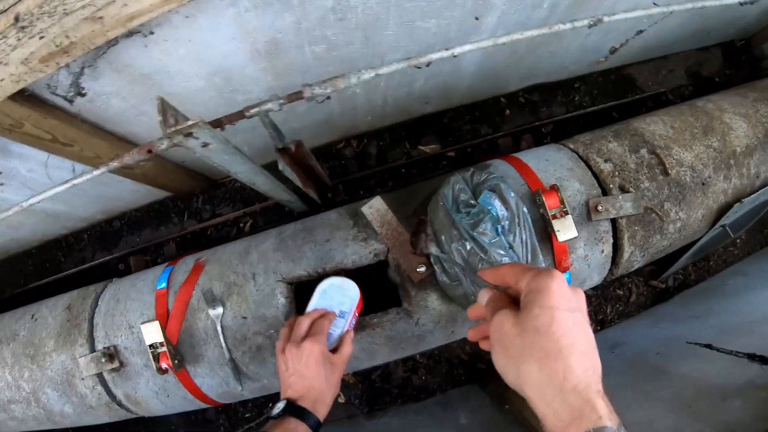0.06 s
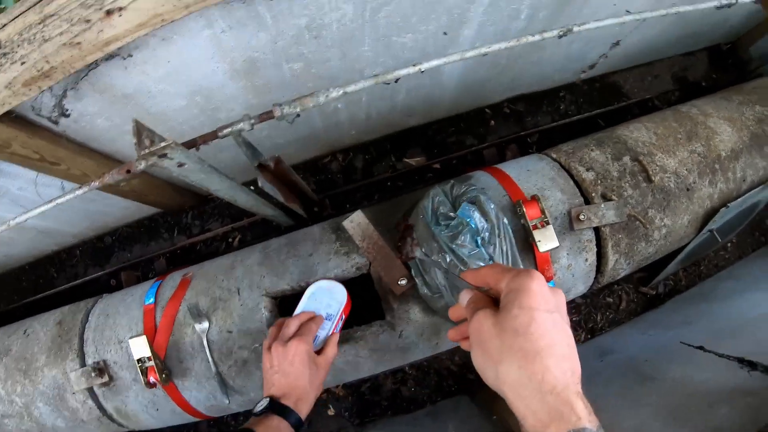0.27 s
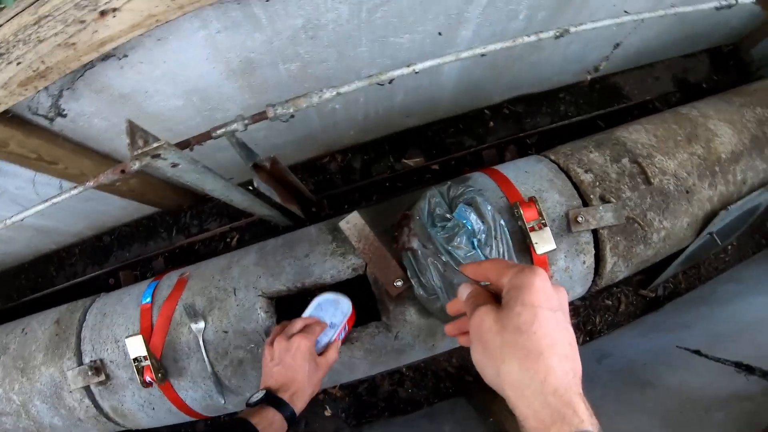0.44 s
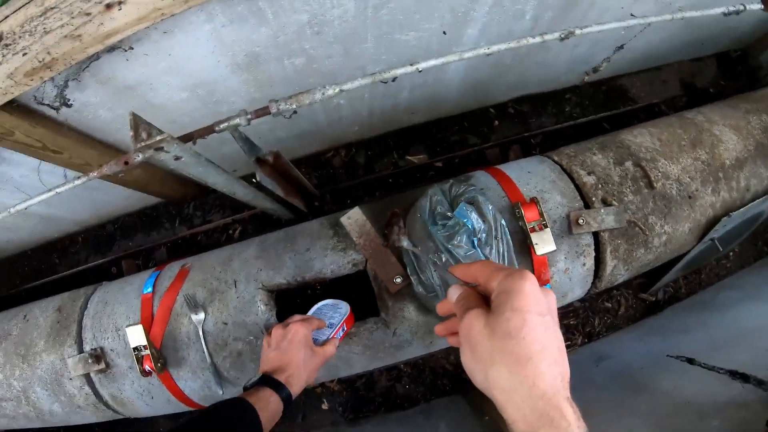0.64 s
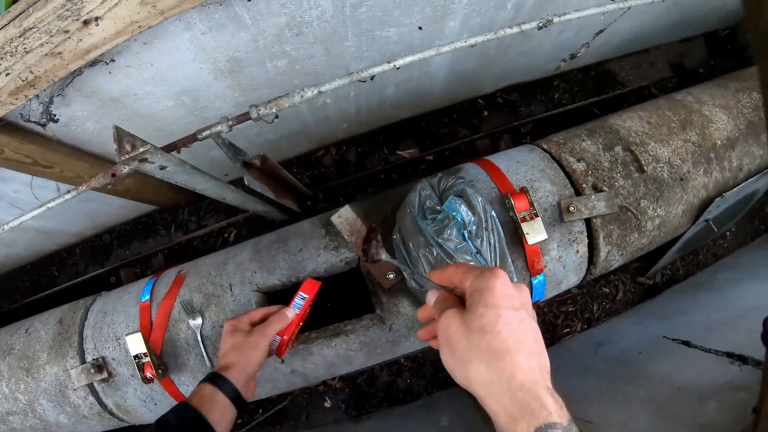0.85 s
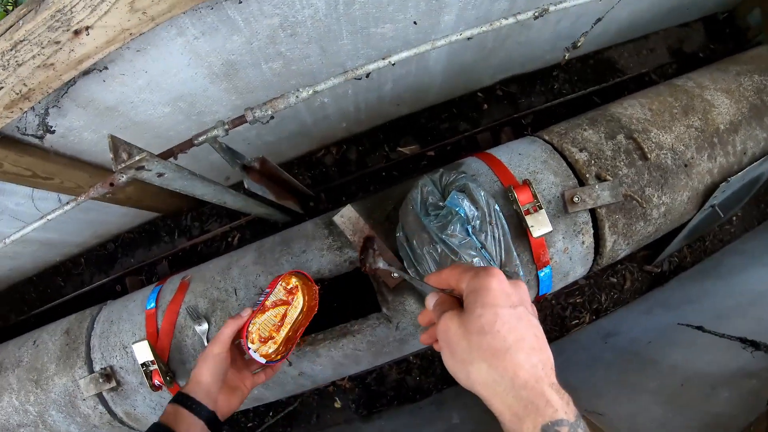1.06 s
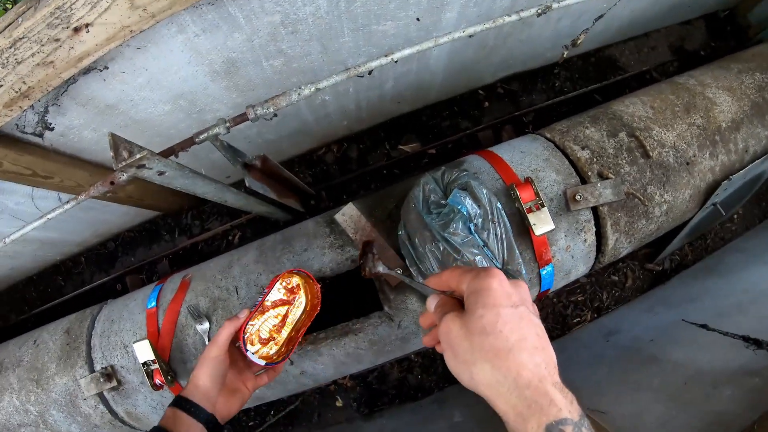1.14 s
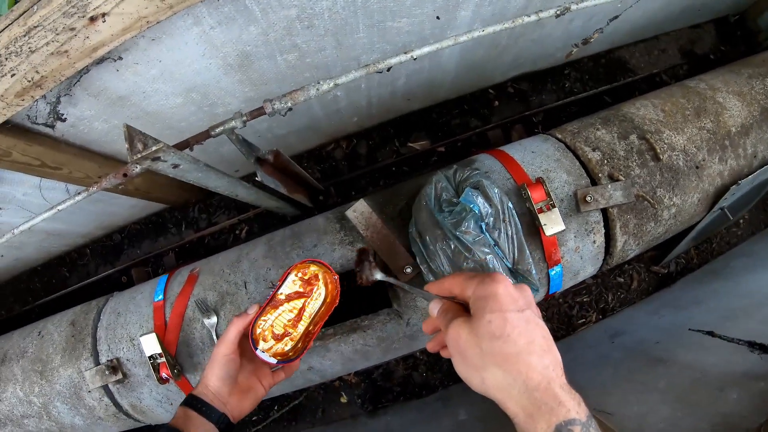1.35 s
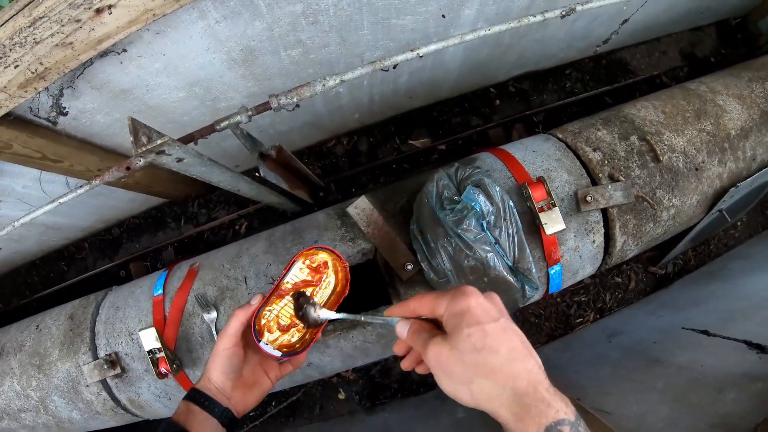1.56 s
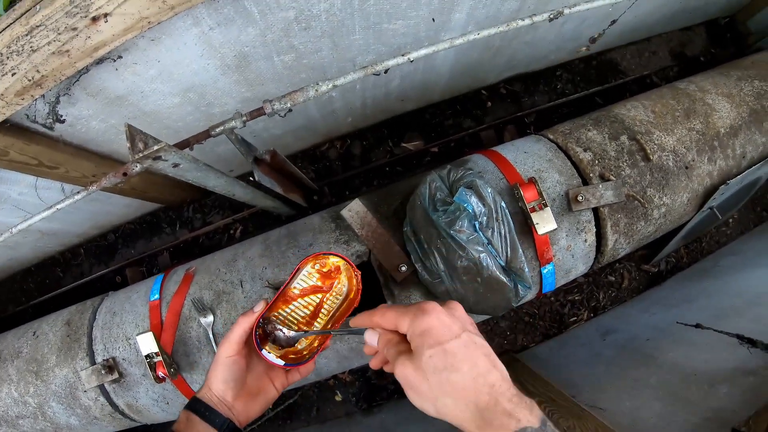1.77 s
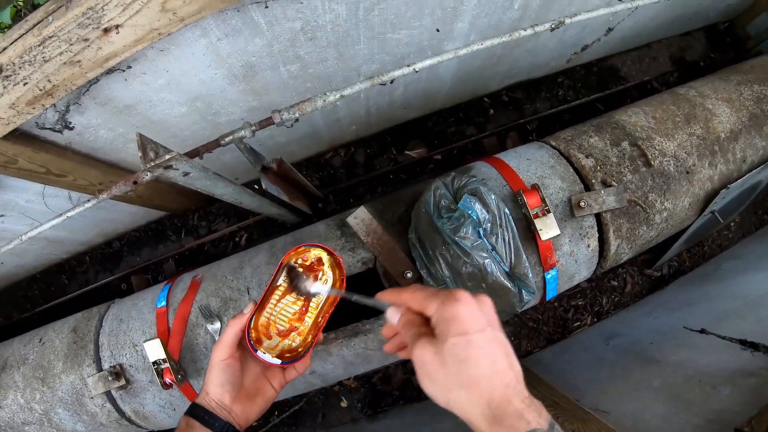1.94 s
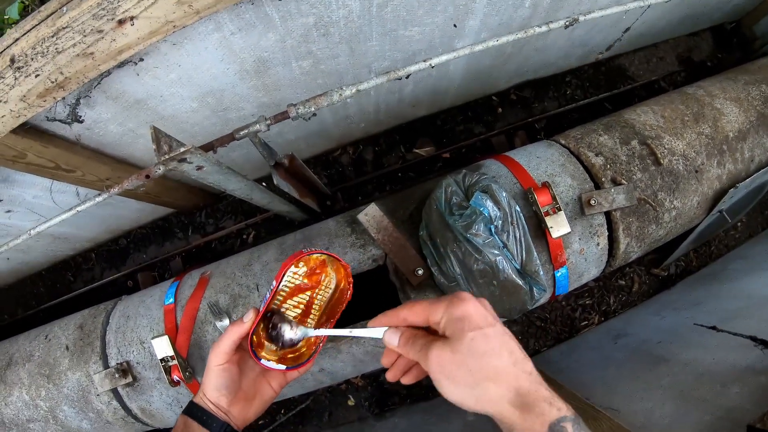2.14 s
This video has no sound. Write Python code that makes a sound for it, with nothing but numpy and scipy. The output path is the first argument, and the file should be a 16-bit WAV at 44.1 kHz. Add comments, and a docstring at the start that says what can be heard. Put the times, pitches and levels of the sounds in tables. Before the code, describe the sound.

A small food tin clacks four times in quick succession against a steel pipe, which rings faintly. After a pause, a spoon ticks into the tin and scrapes once. The sounds are close, outdoors, over low wind.

```python
"""Outdoors, a small food tin is knocked four times on the rim of an opening in a big steel pipe.
Each knock is a bright clack of thin metal with a duller second contact as the tin settles, and the
pipe rings faintly on. Two light ticks fall between the first knocks. Then a spoon ticks into the tin
and scrapes once along its bottom, sticking and slipping, over quiet air and low wind."""
import sys
import numpy as np
from scipy import signal
from scipy.fft import rfft, irfft
from scipy.io import wavfile
from scipy.ndimage import uniform_filter1d

SR = 44100
rng = np.random.default_rng(int(sys.argv[2]) if len(sys.argv) > 2 else 0)


def store_pcm(level_fs):
    """Save levels as 16-bit WAV."""
    pcm = np.round(np.clip(level_fs, -1, 1) * 32767).astype(np.int16)
    wavfile.write(sys.argv[1], SR, np.atleast_2d(pcm).T)


N = 97020
TOP_HZ = 15750

# The tin's upper resonances, which colour every clack. Each row: centre in Hz, width in Hz, lift in dB.
TIN_SHEEN = [(2754, 18, 5.5), (3840, 210, 5.5), (4290, 250, 6.5), (5340, 270, 7.5), (6170, 97, 8),
             (6520, 100, 8), (7030, 220, 8), (8060, 480, 5), (8940, 190, 0.5), (9300, 240, 1),
             (9900, 460, 3), (10640, 320, 3.5), (11360, 250, -0.5), (12140, 370, 10), (13500, 310, 7.5),
             (14200, 290, 4)]
# The tone of the spoon touching the tin. Each row: frequency in Hz, relative level in dB.
SPOON_EQ = [(130, -25), (270, -27), (440, -36), (800, -2), (1500, -4.5), (2900, -1.5), (3500, -12.5),
            (5200, -7), (7000, -24), (10500, -10.5), (16000, -22)]


def amp(db):
    """Decibels to gain."""
    return 10 ** (np.asarray(db) / 20)


def unit(x):
    """Scales to an rms of 1."""
    return x / np.sqrt(np.mean(x ** 2) + 1e-20)


def read(curve, hz):
    """Reads a curve on a log-frequency axis."""
    points_hz, values = np.transpose(curve)
    return np.interp(np.log(hz + 1), np.log(points_hz + 1), values)


def add(mix, start_s, sound):
    """Mixes a sound in at its start time."""
    part = mix[max(round(start_s * SR), 0):][:len(sound)]
    part += sound[:len(part)]


def seconds(size):
    """Time axis."""
    return np.arange(size) / SR


def colour(x, eq, peaks=(), size=4096):
    """Minimum-phase EQ of unit energy, drawn from a curve and resonant peaks."""
    hz = abs(np.fft.fftfreq(size, 1 / SR))
    db = read(eq, hz) + sum(lift / (1 + (2 * (hz - centre) / width) ** 2) for centre, width, lift in peaks)
    response = np.exp(np.conj(signal.hilbert(np.log(amp(db)))))
    taps = np.fft.ifft(response).real[:size // 2]
    return signal.fftconvolve(x, taps / np.linalg.norm(taps))[:len(x)]


def shelf(x, treble_db, corner_hz=3000):
    """Raises or lowers the treble."""
    low = signal.lfilter(*signal.butter(1, corner_hz, fs=SR), x)
    return low + amp(treble_db) * (x - low)


def resonate(x, hz, width_hz):
    """A resonance of gain 1 whose centre may glide."""
    carrier = np.exp(2j * np.pi * np.cumsum(hz * np.ones(len(x))) / SR)
    pole = np.exp(-np.pi * width_hz / SR)
    return 2 * (carrier * signal.lfilter([1 - pole], [1, -pole], x / carrier)).real


def dying_noise(t60_curve, size=16384):
    """Noise whose bands each die at their own speed."""
    hz, t, bands = signal.stft(rng.standard_normal(size), SR, nperseg=256)
    return signal.istft(bands * amp(-60 * t / read(t60_curve, hz)[:, None]), SR)[1][:size]


def burst(t60, hold_s=0, attack_s=0.0004, size=16384):
    """Chatter of a metal contact: quick attack, hold, fast decay."""
    t = seconds(size)
    envelope = np.minimum(t / attack_s, 1) * amp(-60 * np.maximum(t - hold_s, 0) / t60)
    return rng.standard_normal(size) * envelope


def mode(hz, db, t60, attack_s=0.0037):
    """One dying partial, struck from rest."""
    t = seconds(SR)
    return amp(db - 60 * t / t60) * np.minimum(t / attack_s, 1) * np.sin(2 * np.pi * hz * t)


def air_and_wind(air_trim_db=-55.5):
    """The bed: a smooth distant hiss and low lumps of wind."""
    # The tone of each layer. Each row: frequency in Hz, relative level in dB.
    air_eq = [(59, -40), (100, -1.5), (215, -5), (328, -6), (365, -3.5), (910, -12), (991, -14.5),
              (6020, -19), (12400, -23), (16000, -36)]
    wind_eq = [(15, -1), (28, 0), (50, -5), (90, -16.5), (160, -26.5), (400, -53.5)]
    # The breeze rises and falls. Each row: time in seconds, wind level in dB, air lift in dB.
    breeze = [(0, -36.5, 8), (.08, -47, 4.5), (.7, -48, 1.5), (1.1, -48, 0), (1.4, -48.5, 0), (1.6, -46, 0),
              (1.95, -44.5, 4.5), (2.06, -49.5, -1.5), (2.18, -36, -0.5)]
    times, wind_db, air_db = np.transpose(breeze)
    hz, t = np.fft.rfftfreq(N, 1 / SR), seconds(N)
    wind_band = (hz > wind_eq[0][0]) & (hz < wind_eq[-1][0])
    air = unit(irfft(rfft(rng.standard_normal(N)) * amp(read(air_eq, hz)) * (hz < TOP_HZ), N))
    wind = unit(irfft(rfft(rng.standard_normal(N)) * amp(read(wind_eq, hz)) * wind_band, N))
    return air * amp(air_trim_db + np.interp(t, times, air_db)) + wind * amp(np.interp(t, times, wind_db))


def reflections(close, wet_db=-23):
    """A faint, short return from the surfaces nearby."""
    # The treble dies first. Each row: frequency in Hz, t60 in seconds.
    return_t60 = [(150, 0.254), (1500, 0.24), (5000, 0.19), (15000, 0.16)]
    impulse = dying_noise(return_t60)
    return amp(wet_db) * signal.fftconvolve(close, impulse / np.linalg.norm(impulse))[:N]


def spoon_ticks():
    """Light, damped touches of spoon and tin, each with a brief ring and a faint diffuse tail."""
    # Each row: start in seconds, gain in dB, treble shelf in dB.
    touches = [(0.2315, -14, 2), (.243, -13.5, 7.5), (1.6535, 1, -1)]
    # What a tick rings in the held tin. Each row: pitch in Hz, level in dB, t60 in seconds.
    tick_modes = [(460, -29, 0.033), (1420, -31.5, 0.042), (1660, -31.5, 0.044), (2240, -34, 0.031),
                  (2950, -33, 0.035), (5270, -39, 0.016)]
    out = np.zeros(N)
    for start, db, treble_db in touches:
        contact = burst(t60=0.027, hold_s=0.001) + amp(-11) * burst(t60=0.15)
        tick = sum(mode(*row) for row in tick_modes)
        add(tick, 0, amp(-30.5) * colour(contact, SPOON_EQ))
        add(out, start, amp(db) * shelf(tick, treble_db))
    return out


def spoon_scrape(wall_s=1.904):
    """The spoon glides, then sticks and slips; each slip rings the tin and swells the rasp of grit."""
    # The stroke. Each row: time in seconds, slips per second, body level in dB, grit level in dB.
    stroke = [(1.842, 87.3, -35, -45.5), (1.865, 117.7, -31.5, -38), (1.888, 134.5, -32.5, -34.5),
              (1.906, 183, -23, -27), (1.918, 182, -35, -25), (1.93, 150, -52, -33),
              (1.938, 150, -35.5, -35.5), (1.955, 125, -50, -50)]
    # The tin held in the hand. Each row: centre in Hz, width in Hz, relative level in dB.
    body_resonances = [(694, 22, -29), (1120, 114, -4), (1302, 110, 2.5), (1420, 78, 8), (1730, 97, -0.5),
                       (2440, 44, -5), (2936, 50, -3)]
    # The tone of the rasp. Each row: frequency in Hz, relative level in dB.
    grit_eq = [(150, -5), (250, -24), (420, 4), (650, -34), (900, 0), (1500, 5.5), (2800, 0.5), (4000, -5),
               (7000, -11.5), (10500, -7), (16000, -15.5)]
    # The bottom flexes as the spoon meets the wall. Each row: pitch in Hz, level in dB, t60 in seconds.
    bottom_modes = [(172, -34, 0.19), (364.5, -23, 0.11), (530, -32, 0.079), (725, -32, 0.1),
                    (2240, -23.5, 0.06)]
    jitter, snap, drag, slip_decay_s = 0.012, 16.5, 0.28, 0.0007
    grit_floor, grit_decay_s = 0.36, 0.0036
    glide_s, glide_width_s = 1.81, 0.028

    times, rates, body_db, grit_db = np.transpose(stroke)
    t = np.arange(times[0], times[-1], 1 / SR)
    wobble = unit(uniform_filter1d(rng.standard_normal(N), size=200))[:len(t)]
    rate = np.interp(t, times, rates) * (1 + jitter * wobble)
    cycles = np.cumsum(rate) / SR
    slips = np.diff(np.floor(cycles), prepend=-1)
    since_slip = cycles % 1 / rate
    rub = (drag + np.exp(-since_slip / slip_decay_s)) * rng.standard_normal(N)[:len(t)]
    friction = snap * slips + rub
    body = sum((-1) ** k * amp(db) * resonate(friction, hz, width)
               for k, (hz, width, db) in enumerate(body_resonances))
    flex_hz = np.interp(t, [times[0], wall_s], [440, 363])  # the bottom's note sinks as the spoon travels
    body += amp(3) * resonate(friction, flex_hz, width_hz=58)
    grit_pulse = grit_floor + np.exp(-since_slip / grit_decay_s)
    grit = colour(grit_pulse * rng.standard_normal(N)[:len(t)], grit_eq)
    glide = shelf(colour(rng.standard_normal(N), SPOON_EQ), treble_db=-19)

    out = amp(-49.5) * np.exp(-((seconds(N) - glide_s) / glide_width_s) ** 2) * glide
    add(out, times[0], unit(body) * amp(np.interp(t, times, body_db)))
    add(out, times[0], unit(grit) * amp(np.interp(t, times, grit_db)))
    add(out, wall_s, sum(mode(*row) for row in bottom_modes))
    return out


def pipe_ring():
    """The long, faint ring of the struck steel pipe."""
    # Each row: pitch in Hz, level in dB, t60 in seconds.
    pipe_modes = [(185.7, -30, 0.35), (816, -46.5, 0.76), (1350, -45.5, 0.4), (1682, -43, 0.37),
                  (1812, -42, 0.39), (2320, -48.5, 0.46)]
    return sum(mode(*row) for row in pipe_modes)


def tin_rebounds():
    """The tin settles after each knock: a softer, duller contact with a short thud."""
    # Each row: start in seconds, contact level in dB, thud pitch in Hz, thud level in dB.
    rebounds = [(.1287, -15.5, 550, -19.5), (0.2983, -19.5, 475, -33), (.4455, -21, 449, -21),
                (.5565, -23.5, 601, -13.5)]
    # The tone of the contact. Each row: frequency in Hz, relative level in dB.
    rebound_eq = [(100, -9), (500, -7.5), (790, -14), (1100, -0.5), (1700, -4), (2500, -12), (4000, -19),
                  (6000, -25), (12000, -29.5), (16000, -33)]
    out = np.zeros(N)
    for start, db, thud_hz, thud_db in rebounds:
        add(out, start, amp(db) * colour(burst(t60=0.088), rebound_eq, TIN_SHEEN))
        add(out, start, mode(thud_hz, thud_db, t60=0.037))
    return out


def tin_clack(decay_scale, clatter_attack_s=0.01):
    """The rim bites, the thin metal's dense modes clack, and a clatter follows."""
    # The tone of clack and clatter. Each row: frequency in Hz, relative level in dB.
    clack_eq = [(80, -11.5), (400, -8.5), (600, -6), (790, -7), (1100, 2), (1800, 1), (2500, -6.5),
                (4000, -5.5), (4800, -9), (7000, -8), (13000, -13), (16000, -16)]
    clatter_eq = [(80, -19.5), (450, -12.5), (790, -23.5), (1150, 0.5), (1700, -6.5), (2600, 3.5),
                  (4000, 0), (6000, -11), (11000, -6.5), (16000, -46)]
    # The clatter's decay. Each row: frequency in Hz, t60 in seconds before scaling.
    clatter_t60 = [(150, 0.38), (600, 0.31), (1400, 0.26), (3000, .115), (7000, 0.11), (15000, 0.12)]
    contact = amp(-11) * burst(t60=0.022, hold_s=0.0036)
    add(contact, 0.00067, [amp(3.5)])  # one spike: the rim's sharp first bite
    tail = dying_noise([(hz, t60 * decay_scale) for hz, t60 in clatter_t60])
    tail *= np.minimum(seconds(len(tail)) / clatter_attack_s, 1)
    return colour(contact, clack_eq, TIN_SHEEN) + amp(-16) * colour(tail, clatter_eq, TIN_SHEEN)


def tin_knocks(scatter_db=3, earlier_knock_s=0.17):
    """Four blows ring both tin and pipe; where the tin lands decides which of its bands speaks most."""
    # Each row: start in seconds, gain in dB, treble shelf in dB, lifts of the low, middle and high
    # bands in dB, pipe trim in dB, scale on the tin's decay times.
    blows = [(0.1138, 0.5, -1, 5, -7, 4, -1, 0.78), (0.2785, 1, -1, 1.5, 1, 0.5, -2.5, 0.87),
             (0.425, 0, 0.5, -0.5, 2.5, -2.5, -1, 0.76), (0.538, -3, -5, 0.5, 5, -5, -1.5, 0.84)]
    # The tin against the pipe. Each row: pitch in Hz, mean level in dB, t60 in seconds before scaling.
    tin_modes = [(275.4, -32, 0.18), (545, -36, 0.21), (905, -28.5, 0.16), (1028, -27, 0.14),
                 (1112, -23.5, .13), (1168, -21.5, 0.115), (1241, -23.5, 0.12), (1325, -28, 0.13),
                 (1668, -16, .095), (1722, -18.5, 0.06), (1819, -21.5, 0.115), (1950, -25, 0.08),
                 (2047, -21.5, 0.075), (2247, -24, 0.08), (2544, -27, .1), (2725, -26, .085),
                 (2897, -26, 0.09), (3776, -23, 0.08)]
    out = np.zeros(N)
    for start, db, treble_db, low_db, mid_db, high_db, pipe_db, decay_scale in blows:
        clack = shelf(tin_clack(decay_scale), treble_db)
        tin = sum(mode(hz, level + scatter_db * rng.standard_normal(), t60 * decay_scale)
                  for hz, level, t60 in tin_modes)
        add(tin, 0, clack)
        bands = [(1200, 300, low_db), (1685, 140, mid_db), (3850, 800, high_db)]  # centre, width in Hz
        add(out, start, amp(db) * colour(tin, eq=[(0, 0)], peaks=bands))
        add(out, start, amp(db + pipe_db) * pipe_ring())
    add(out, 0, pipe_ring()[round(earlier_knock_s * SR):])  # still ringing from a knock before the start
    return out


def scene():
    """Close metal sounds and their reflections over the outdoor bed, in mono."""
    close = tin_knocks() + tin_rebounds() + spoon_ticks() + spoon_scrape()
    return (close + reflections(close) + air_and_wind())[None]


def record(dry):
    """Rounds the peaks softly, then cuts the very top."""
    rounded = dry / (1 + dry ** 4) ** .25
    lowpass_taps = signal.firwin(401, TOP_HZ, window=("kaiser", 8), fs=SR)
    return signal.oaconvolve(rounded, lowpass_taps[None], "same")


dry = scene()
out = record(dry)
store_pcm(out)
```